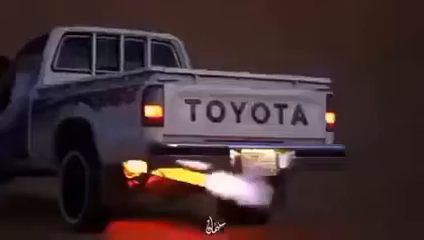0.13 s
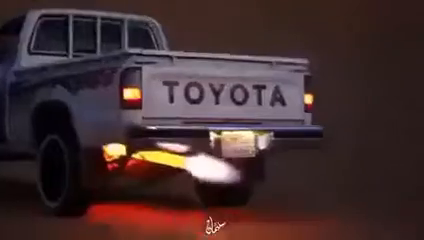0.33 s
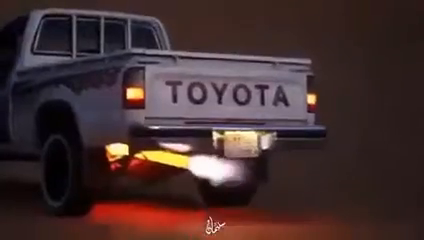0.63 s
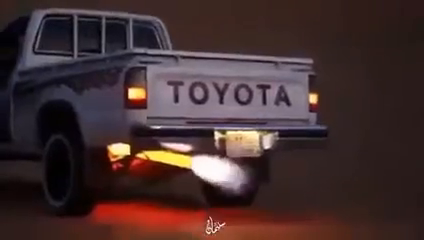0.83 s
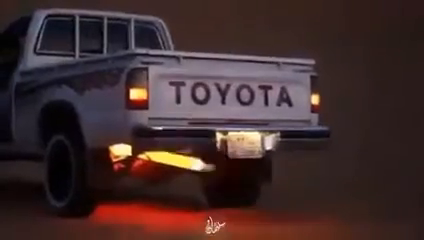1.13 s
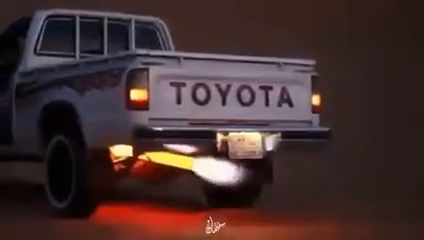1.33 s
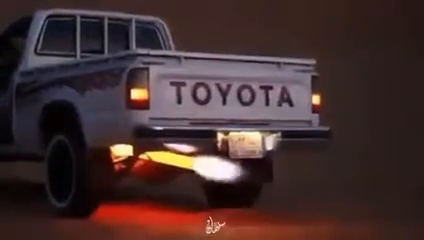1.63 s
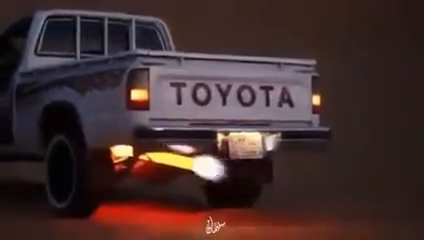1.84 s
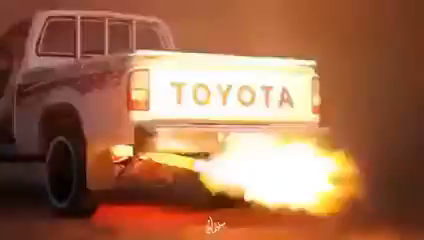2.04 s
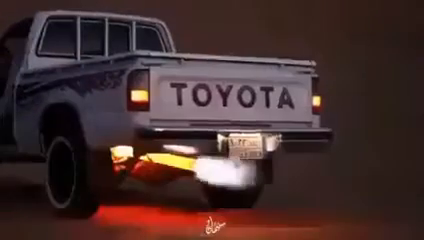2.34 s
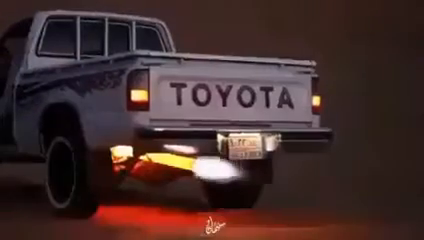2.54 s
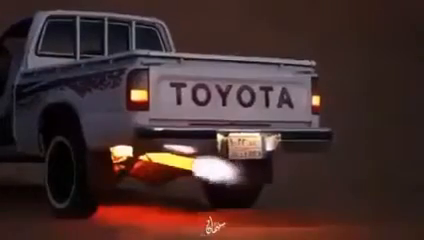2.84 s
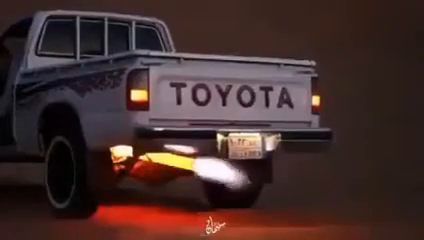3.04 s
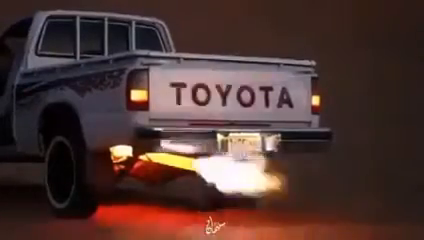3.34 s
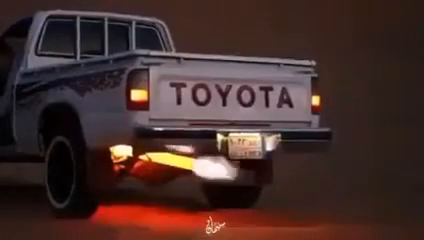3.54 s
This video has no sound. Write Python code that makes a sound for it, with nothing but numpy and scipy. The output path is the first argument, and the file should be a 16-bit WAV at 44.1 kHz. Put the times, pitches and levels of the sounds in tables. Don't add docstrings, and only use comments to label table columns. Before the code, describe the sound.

Close behind a pickup's tailpipe outdoors, a four-cylinder engine bounces on its limiter, rough and fluttering, with constant sharp pops; around two seconds it hums, bangs hard with flame, then resumes popping.

```python
import sys
import numpy as np
from scipy import signal
from scipy.io import wavfile
from scipy.ndimage import uniform_filter1d

SR = 44100
rng = np.random.default_rng(int(sys.argv[2]) if len(sys.argv) > 2 else 0)


def int16_out(signal):
    q = np.round(np.clip(np.atleast_2d(signal).T, -1, 1) * 32767)
    wavfile.write(sys.argv[1], SR, q.astype(np.int16))


def voltage_ratio(level):
    return 10 ** (np.asarray(level, float) / 20)


N = 161847
TIME_S = np.arange(N) / SR


def evened(x):
    return x / np.sqrt(np.mean(x ** 2) + 1e-20)


def wander(x, size):
    return evened(uniform_filter1d(uniform_filter1d(x, size), size))


def curve(table, column):
    rows = np.array(table)
    return np.interp(TIME_S, rows[:, 0], rows[:, column])


def colour(points):
    f, db = np.transpose(points)
    hz = np.abs(np.fft.fftfreq(8192, 1 / SR))
    log_gain = np.interp(np.log(hz + 1), np.log(f + 1), np.maximum(db, -100)) * np.log(10) / 20
    taps = np.fft.ifft(np.exp(np.conj(signal.hilbert(log_gain)))).real[:4096]
    return taps / np.linalg.norm(taps)


def through(x, taps):
    return signal.oaconvolve(x, taps)[:N]


def patchy(x, patchy_db):
    z = signal.stft(x, nperseg=512)[2]
    patches = uniform_filter1d(rng.standard_normal(z.shape), size=3, axis=0)
    patches = evened(uniform_filter1d(patches, size=4, axis=1))
    return signal.istft(z * voltage_ratio(patchy_db * patches), nperseg=512)[1][:N]


def yard(x):
    t60_s, level_db = 0.19, -18
    t = np.arange(SR // 2) / SR
    echoes = (rng.random(len(t)) < .05) * rng.choice([-1., 1.], len(t))
    tail = echoes * voltage_ratio(-60 * t / t60_s) * (t > .004)
    tail = uniform_filter1d(tail, size=5)
    return x + voltage_ratio(level_db) * through(x, tail / np.linalg.norm(tail))


def ground_notch(x):
    notch_hz, width_hz, share = 1777, 440, 0.29
    return x - share * signal.lfilter(*signal.iirpeak(notch_hz, notch_hz / width_hz, SR), x)


def rasp():
    middle_s, span_s, mode_hz, level_db = 1.865, 0.045, 1180, -33
    crank_hz = curve(FIRING_RATE, 1) / 2
    turns = np.cumsum(crank_hz) / SR
    tone = 0
    for k in range(9, 19):
        tone = tone + np.cos(2 * np.pi * k * turns) * np.exp(-((k * crank_hz - mode_hz) / 220) ** 2)
    return voltage_ratio(level_db) * tone * np.exp(-((TIME_S - middle_s) / span_s) ** 4)


# start_s, centre_hz, level_db
BOOM_PATH = [
    (1.78, 258, -20.5),
    (1.83, 249, -22),
    (1.9, 210, -18),
    (1.93, 187, -20),
    (1.97, 193.4, -14.5),
    (2.03, 179, -22),
    (2.08, 174, -22),
    (2.12, 172, -31),
]


def boom():
    width_hz, beat_s = 28, 1.904
    cam_hz, centre = curve(FIRING_RATE, 1) / 4, curve(BOOM_PATH, 1)
    turns = np.cumsum(curve(FIRING_RATE, 1)) / SR / 4
    turns -= np.interp(beat_s, TIME_S, turns)
    fade_in = np.clip((TIME_S - BOOM_PATH[0][0]) / 0.0073, 0, 1)
    fade_out = np.clip((BOOM_PATH[-1][0] - TIME_S) / 0.014, 0, 1)
    tone = 0
    for k in range(2, 18):
        order = np.cos(2 * np.pi * k * turns)
        for m in (1, 2, 3):
            nearness = np.exp(-((k * cam_hz - m * centre) / (m * width_hz)) ** 2)
            tone = tone + order * voltage_ratio(-17 * (m - 1)) * nearness
    return np.sqrt(2) * tone * fade_in * fade_out * voltage_ratio(curve(BOOM_PATH, 2))


# start_s, pitch_hz, level_db
FLAME_BLASTS = [
    (2.008, 390, -7),
    (2.037, 420, -7.5),
]


def blasts():
    rise_s = 0.0035
    out = np.zeros(N)
    for s, hz, db in FLAME_BLASTS:
        u = np.maximum(TIME_S - s, 0) / rise_s
        out += voltage_ratio(db) * u * np.exp(1 - u) * np.sin(2 * np.pi * hz * (TIME_S - s))
    return out


# middle_s, length_s, pitch_hz, level_db
MODE_SWELLS = [(0.222, 0.025, 578, -18), (0.236, 0.046, 410.8, -16), (0.248, 0.036, 258.0, -18.3),
               (0.307, 0.041, 443.5, -15.5), (0.41, 0.041, 568, -24), (0.544, 0.024, 418, -16),
               (0.555, 0.18, 415.8, -19.5), (0.683, 0.041, 280.0, -15.5), (0.72, 0.085, 403.6, -24),
               (0.748, 0.069, 587.0, -16.5), (0.96, 0.035, 194.0, -14.5), (0.99, 0.036, 97.3, -19),
               (1.013, 0.16, 404.0, -19.5), (1.061, 0.11, 448.4, -16.5), (1.072, 0.058, 285.0, -17),
               (1.147, 0.093, 382.0, -20), (1.271, 0.013, 431.0, -18.0), (1.315, 0.021, 565, -20.5),
               (1.411, 0.022, 627, -15.5), (1.436, 0.063, 275.0, -17.5), (1.448, 0.12, 388.0, -18.5),
               (1.617, 0.097, 382.0, -21.5), (1.741, 0.025, 424, -21), (2.033, 0.032, 678, -15.5),
               (2.035, 0.071, 570, -19), (2.15, 0.17, 387, -19.5), (2.227, 0.033, 435, -21),
               (2.351, 0.023, 442.6, -14), (2.388, 0.077, 402, -16), (2.479, 0.034, 590, -20),
               (2.484, 0.049, 401, -18), (2.534, 0.015, 420.0, -10), (2.614, 0.056, 252.5, -16),
               (2.615, 0.041, 605, -17.5), (2.639, 0.019, 415.7, -12), (2.76, 0.05, 415.3, -16),
               (2.819, 0.037, 574, -22), (2.86, 0.1, 397.3, -21), (2.875, 0.035, 280.0, -17.5),
               (2.915, 0.029, 576.0, -17), (3.013, 0.033, 398.0, -20), (3.054, 0.037, 587.0, -19.5),
               (3.15, 0.049, 587.0, -20.5), (3.385, 0.018, 194.2, -12.5), (3.39, 0.058, 420.0, -14.5),
               (3.391, 0.033, 608.0, -14), (3.525, 0.048, 420, -30), (3.62, 0.039, 260.1, -17),
               (3.653, 0.05, 570, -16.5)]


def swells():
    gain_db, wobble_share, throb = -2.5, 0.02996, 0.5
    out = np.zeros(N)
    wobble = 1 + wobble_share * wander(rng.standard_normal(N), 900)
    warped_s = np.cumsum(wobble) / SR
    cam = np.cumsum(curve(FIRING_RATE, 1)) / SR / 4
    for (s, length, hz, db), turn in zip(MODE_SWELLS, rng.random((80, 2))):
        near = slice(max(int((s - 2 * length) * SR), 0), int((s + 2 * length) * SR))
        shape = np.exp(-np.log(16) * ((TIME_S[near] - s) / length) ** 2)
        shape = shape * (1 + throb * np.cos(2 * np.pi * (cam[near] + turn[1])))
        out[near] += voltage_ratio(db + gain_db) * shape * np.sin(2 * np.pi * (hz * warped_s[near] + turn[0]))
    return out


# middle_s, drop_db
BRIEF_DIPS = [(0.327, -13), (0.344, -23), (0.897, -6), (1.76, -5), (1.914, -1), (2.172, -11), (2.365, -5),
              (2.452, -14), (2.559, -16), (2.578, -10), (2.759, -8), (2.805, -3), (2.896, -19), (3.325, -1)]


def gaps():
    gap_s = .014
    drop_db = 0
    for s, db in BRIEF_DIPS:
        drop_db = drop_db + db * np.cos(np.pi * np.clip((TIME_S - s) / gap_s, -.5, .5)) ** 2
    return voltage_ratio(drop_db)


# start_s, length_s, exhaust_drop_db, crackle_drop_db
SPARK_CUTS = [
    (0.9, 0.059, -2.5, -10),
    (1.737, 0.088, -5.5, -4.5),
    (1.816, 0.1, -3, 1.5),
    (1.906, 0.1, -6.5, -6.5),
    (2.065, 0.048, -6, -5),
    (2.505, 0.019, -6, -30),
    (3.171, 0.24, -5.5, -19),
]


def cut(column):
    edge_s = 0.027
    drop_db = 0
    for row in SPARK_CUTS:
        inside_s = np.minimum(TIME_S - row[0], row[0] + row[1] - TIME_S)
        drop_db = drop_db + row[column] * np.clip(inside_s / edge_s + .5, 0, 1)
    return drop_db


# pitch_hz, width_hz, level_db
PIPE_MODES = [(94.6, 26, -6), (148.1, 30, -14.5), (275, 20, 0), (381.7, 33.5, 0.5), (425.8, 41, 0.5),
              (593, 54, 0.5), (854, 60, -17), (1193, 80, -11.5), (1380, 260, -17)]


def pipe():
    t = np.arange(4096) / SR
    ring = 0
    for k, (hz, width_hz, db) in enumerate(PIPE_MODES):
        decay = np.exp(-np.pi * width_hz * t)
        ring = ring + (-1) ** k * voltage_ratio(db) * np.sqrt(width_hz) * decay * np.sin(2 * np.pi * hz * t)
    return ring / np.linalg.norm(ring)


def push(length_s):
    u = np.arange(1024) / SR / length_s
    shape = u * (2 - u) * np.exp(-u)
    return shape / np.linalg.norm(shape)


def crack(t60_s, tail_db):
    rise_s, tail_t60_s = .0016, 0.13
    t = np.arange(6000) / SR
    decay = voltage_ratio(-60 * t / t60_s) + voltage_ratio(tail_db - 60 * t / tail_t60_s)
    return np.minimum(t / rise_s, 1) ** 2 * decay


# start_s, crack_db, thump_db
SHARP_POPS = [(0.2184, -21.5, -13), (0.289, -18.5, -13.5), (0.3334, -14, -14.5), (0.3535, -18.5, -19),
              (0.394, -19, -25), (0.5317, -23, -12.5), (0.6052, -18, -14), (0.6255, -21, -15),
              (0.6985, -21.5, -15), (0.7609, -15.5, -20), (0.8367, -16, -15), (0.8565, -19, -21),
              (0.9627, -26, -14.5), (1.197, -18, -16), (1.2181, -26.5, -13.5), (1.259, -17.5, -16.5),
              (1.3022, -20.5, -17.5), (1.3318, -28, -20), (1.3732, -22.5, -17), (1.3948, -17, -12),
              (1.4496, -23, -20), (1.47, -17, -17), (1.5417, -23, -16), (1.5628, -24.5, -18.5),
              (1.6582, -21.5, -15), (1.6796, -17.5, -20), (1.9026, -20, -20.5),
              (2.1158, -19, -20), (2.235, -17.5, -12.5), (2.2959, -20, -15), (2.3463, -22, -16),
             (2.4223, -23, -12.5), (2.4636, -22, -13.5), (2.5258, -18.5, -14), (2.5985, -17, -9.5),
             (2.6195, -16, -13), (2.673, -22.5, -14), (2.6955, -13, -16.5), (2.7677, -28, -14),
             (2.7876, -25, -15), (2.81, -24, -18.5), (2.8303, -22.5, -18.5), (2.884, -14.5, -13.5),
             (2.9043, -18, -14), (2.9756, -22, -20.5), (3.04, -17.5, -16.5), (3.0611, -18.5, -14.5),
             (3.1152, -18.5, -10.5), (3.1366, -14.5, -16.5), (3.3651, -30, -15.5), (3.3852, -14.5, -18),
             (3.4909, -27, -21), (3.5443, -20.5, -19), (3.5658, -20.5, -13.5), (3.6376, -17.5, -15.5)]
# start_s, crack_db, thump_db
DULL_BANGS = [(0.488, -26, -13.5), (0.6771, -27, -14.5), (0.72, -22, -14.5), (0.7767, -27, -18.5),
              (1.731, -33, -12), (1.7763, -39, -19), (2.0427, -19, -14.5), (2.056, -37, -14.5),
              (2.1264, -21.5, -18.5), (2.1379, -35, -14.5), (2.6368, -27, -12), (2.9553, -33, -19),
              (2.9985, -28, -19), (3.2711, -29, -15), (3.2998, -40, -20.5), (3.3329, -62, -22.5),
              (3.3962, -27, -12.5), (3.5123, -23, -17)]
# frequency_hz, level_db_per_hz
CRACK_SPECTRUM = [(410, -22), (700, -1), (878, -2.5), (2660, -14.5), (3420, -17.5), (9050, -33.5),
                  (10500, -38.5), (13600, -70), (22000, -120)]


def pops():
    misfire_s, misfire_db, damp_s = .009, -6, .006
    s, crack_db, thump_db = np.transpose(SHARP_POPS + DULL_BANGS)
    at, cracks, thumps = (s * SR).astype(int), np.zeros(N), np.zeros(N)
    cracks[at] = voltage_ratio(crack_db - 4)
    thumps[at] = voltage_ratio(thump_db + 22)
    spit = through(patchy(rng.standard_normal(N), 3.5), colour([(700, -13)] + CRACK_SPECTRUM[2:]))
    spit = spit / np.sqrt(uniform_filter1d(spit ** 2, size=160))
    spit = spit * through(cracks, crack(.016, -13))
    ring = pipe()[:1024] * np.exp(-np.arange(1024) / SR / damp_s)
    body = np.convolve(voltage_ratio(-1.5) * push(0.00043) + voltage_ratio(6.5) * ring, np.hanning(19) / 9)
    lead = round(misfire_s * SR)
    misfire = through(np.roll(cracks > 0, -lead) * 1., np.hanning(lead + 60))
    misfire = np.minimum(misfire, 1)
    return spit * voltage_ratio(5.5) + through(thumps, body), voltage_ratio(misfire_db * misfire)


# start_s, firings_per_s
FIRING_RATE = [(.2, 177.7), (1.76, 178), (1.9, 182), (1.96, 172), (2.06, 170.5), (2.15, 190), (3.15, 197),
               (3.36, 177), (3.45, 201)]
CYLINDER_LEVELS = [2.5, -7, 1, -3.5]


def firings():
    lit_share, spread_db, jitter_s = .55, 3.5, 0.00049
    at = np.flatnonzero(np.diff(np.floor(np.cumsum(curve(FIRING_RATE, 1)) / SR)))
    spread, shift = rng.standard_normal((900, 2))[:len(at)].T
    lit = rng.random(900)[:len(at)] < lit_share
    level_db = np.resize(CYLINDER_LEVELS, len(at)) + spread_db * spread
    train = np.zeros(N)
    at = np.clip(at + (shift * jitter_s * SR).astype(int), 0, N - 1)
    train[at] = voltage_ratio(level_db + np.where(lit, 0, -12))
    return train


# start_s, exhaust_db, crackle_db
ENGINE_EFFORT = [(.21, -17.5, -33.5), (.75, -17.5, -34), (1.1, -17.5, -34.5), (1.4, -16.5, -32.5),
                 (1.7, -18, -37), (2.06, -13.5, -31), (2.2, -18, -32.5), (2.45, -16.5, -34.5),
                 (2.65, -16.5, -32.5), (3.15, -18.5, -46), (3.4, -17.5, -43), (3.5, -16.5, -38.5),
                 (3.67, -18.5, -35)]
# frequency_hz, level_db_per_hz
FLAME_SPECTRUM = [(15, -75), (25, -30), (136, 4), (337, -8), (413, 5), (518, -7), (10500, -48),
                  (13600, -63), (22000, -120)]


def engine():
    firing_db, ring_db, flame_db, hiss_db, puff_db = -13.5, -7, -7.5, -10, -1.5
    rattle_db, front_s, drift_s = 1, 0.00036, .0009
    train = firings()
    roar, jet, slow = rng.standard_normal((3, N))
    lumps = voltage_ratio(1.5 * wander(slow, 400))
    rattle = voltage_ratio(6.7 * np.minimum(rng.exponential(1, N), 4)) * (rng.random(N) < 400 / SR)
    fronts = evened(through(train, np.convolve(push(front_s), np.hanning(9))))
    ring = evened(through(evened(train) + voltage_ratio(rattle_db) * evened(rattle), pipe()))
    drift = drift_s * SR * wander(slow[::-1], 1800)
    ring = np.interp(np.arange(N) + drift, np.arange(N), ring)
    flame = evened(through(roar * lumps, colour(FLAME_SPECTRUM)))
    low = voltage_ratio(firing_db) * fronts + voltage_ratio(ring_db) * ring + voltage_ratio(flame_db) * flame
    puffs = voltage_ratio(hiss_db) + voltage_ratio(puff_db) * evened(through(train, crack(0.05, -19.5)))
    hiss = patchy(jet, 4.6) * puffs * voltage_ratio(curve(ENGINE_EFFORT, 2) + cut(3))
    hiss = through(hiss, colour([(300, -26.5)] + CRACK_SPECTRUM))
    return low * voltage_ratio(curve(ENGINE_EFFORT, 1) + cut(2)) + hiss


def scene():
    bangs, misfire = pops()
    exhaust = ((engine() + swells()) * misfire + bangs) * gaps()
    x = exhaust + boom() + blasts() + rasp()
    x = x + .8 * (x ** 2 - uniform_filter1d(x ** 2, 400))
    return ground_notch(yard(x))[None]


def treble_gated(x):
    floor_db, spread_db, top_db, edge_hz = -67, 5, 8, 10500
    hz, _, z = signal.stft(x, SR, nperseg=2048)
    power = abs(z) ** 2
    bands = uniform_filter1d(power, size=8, axis=1)[:, 4::8]
    ragged = evened(uniform_filter1d(rng.standard_normal(bands.shape), size=3, axis=2))
    limit_db = floor_db + spread_db * ragged + top_db * (hz[4::8, None] / edge_hz) ** 4
    limit = power.sum(1, keepdims=True) * voltage_ratio(2 * limit_db)
    keep = np.repeat(bands > limit, 8, axis=1)
    keep = np.concatenate([keep, keep[:, -1:]], axis=1) | (hz < 1500)[:, None]
    return signal.istft(z * keep, SR, nperseg=2048)[1][:, :N]


def roll_off(x):
    return signal.sosfilt(signal.butter(12, 10630, fs=SR, output="sos"), x)


def record(dry):
    start_s, rise_s, edge_hz = 0.2017, 0.0074, 10500
    x = signal.sosfilt(signal.butter(2, 60, "high", fs=SR, output="sos"), dry)
    x = 0.68 * np.tanh(x / 0.72) * np.clip((TIME_S - start_s) / rise_s, 0, 1)
    low_pass = signal.firwin(255, edge_hz, window=("kaiser", 8), fs=SR)
    x = signal.oaconvolve(x, low_pass[None], "same")
    mix = treble_gated(x)
    return roll_off(mix)


dry = scene()
out = record(dry)
int16_out(out)
```